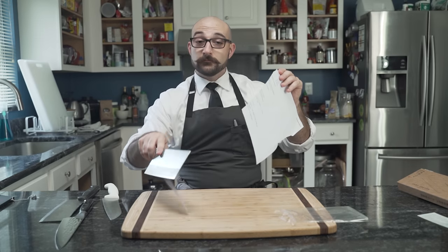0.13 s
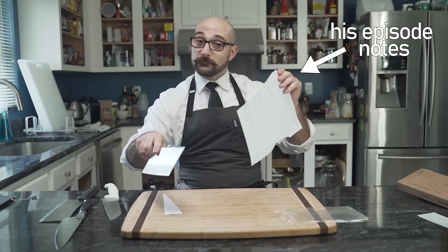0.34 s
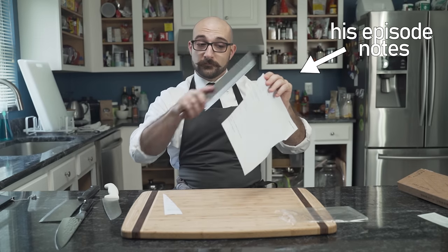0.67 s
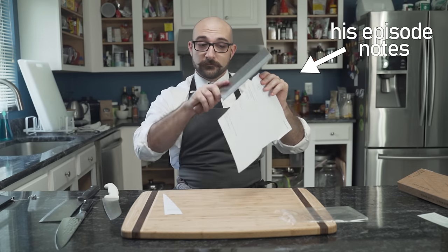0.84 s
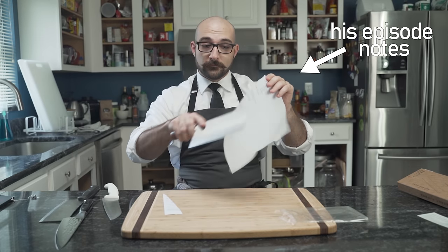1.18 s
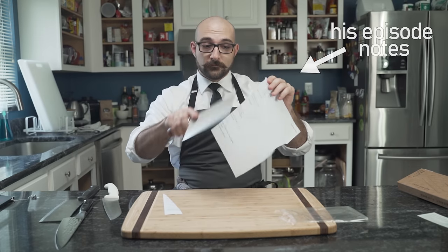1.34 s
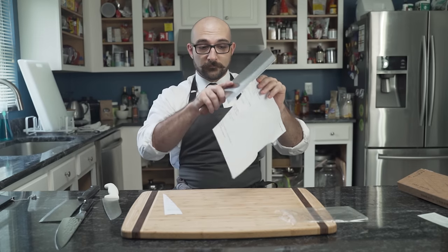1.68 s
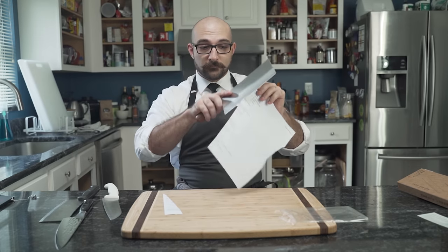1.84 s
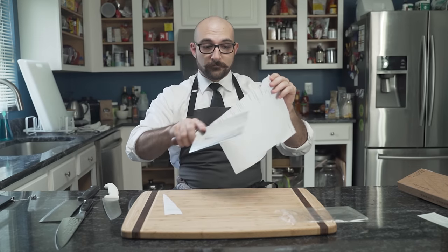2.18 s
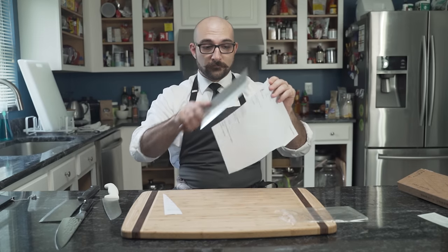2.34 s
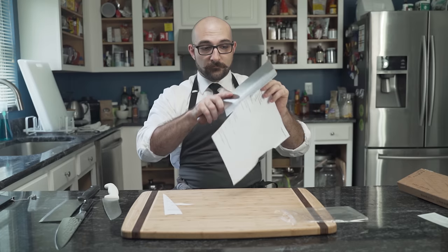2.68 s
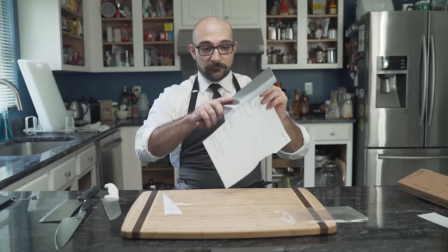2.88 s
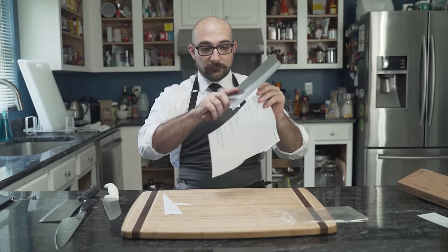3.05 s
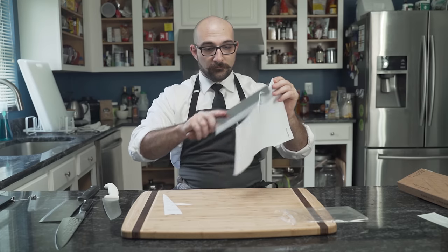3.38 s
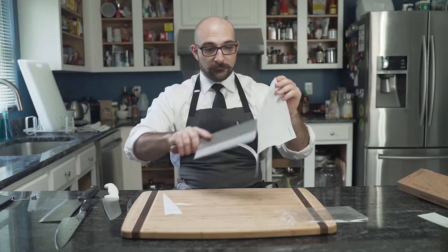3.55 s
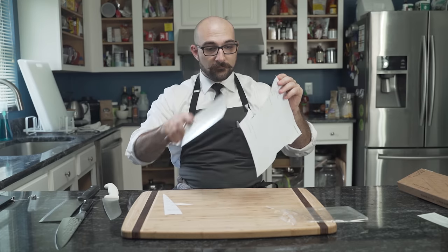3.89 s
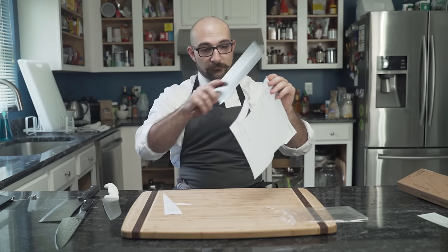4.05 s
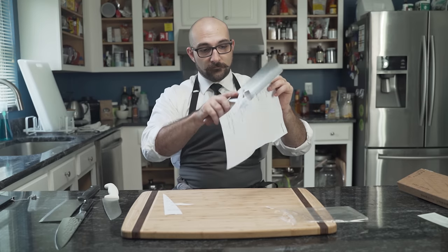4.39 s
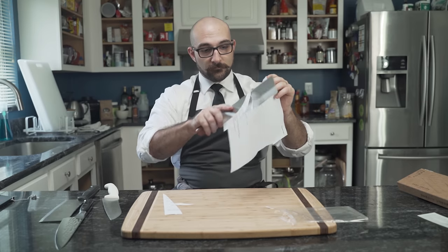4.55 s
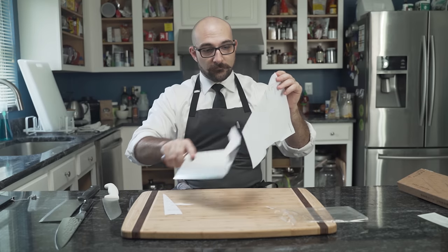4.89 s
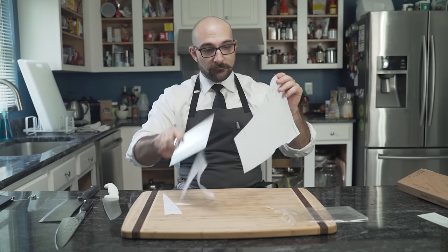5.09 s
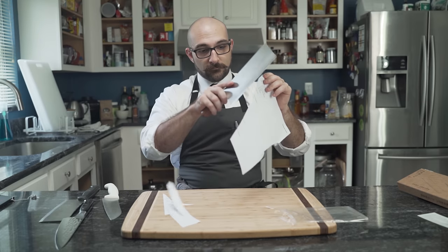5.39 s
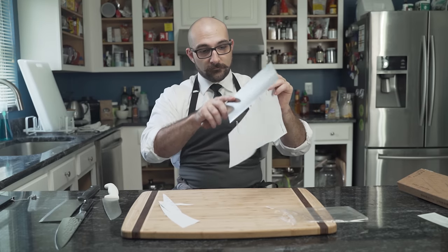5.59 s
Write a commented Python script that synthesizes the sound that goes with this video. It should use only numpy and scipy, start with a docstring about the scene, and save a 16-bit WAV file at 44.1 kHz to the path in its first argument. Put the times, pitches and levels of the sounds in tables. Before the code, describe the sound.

In a reflective kitchen with a faint fridge hum, a large knife slices a hanging sheet of paper. After a nearly quiet first second, short hissing, crackling cuts come in uneven groups, with sharp paper snaps and soft flaps. Thin blade ringing lingers between strokes. The microphone is fairly close and clear, with a short bright room echo.

```python
"""A steel cleaver slices a hand-held sheet of paper in nine strokes, in a hard-walled kitchen.
Parting fibres crackle densely, ring the taut sheet and the paper-damped blade, and flap the loose part.
Off the paper the blade rings on as steady sines until the next touch. During and between cuts the sheet
snaps and buzzes as shaped noise; it also ticks and rustles, and its jerks push low puffs of air.
The paper's echo is a dense decaying tail; a fridge hums behind in steady air noise."""
import sys
import numpy as np
from scipy import signal
from scipy.fft import rfft, irfft, next_fast_len
from scipy.io import wavfile
from scipy.ndimage import uniform_filter1d

SR = 44100
rng = np.random.default_rng(int(sys.argv[2]) if len(sys.argv) > 2 else 0)


def master(y):
    """Save y as 16-bit WAV."""
    cut = np.clip(np.atleast_2d(y).T, -1, 1)
    pcm = np.round(cut * 32767)  # scale
    wavfile.write(sys.argv[1], SR, pcm.astype(np.int16))


N = 252593  # length in samples

# Air noise of the place. Each row: frequency in Hz, relative density in dB per Hz.
AIR_SPECTRUM = [(12, -28.5), (22, 8), (44, -1), (62, -10.5), (120, -3), (200, -10.5), (240, -2),
                (320, -11.5), (680, -17.5), (760, -17), (1800, -27), (3000, -30), (4200, -28), (5200, -33),
                (16000, -44)]
AIR_DB = -63  # rms of the air noise
# Hum of the fridge motor. Each row: frequency in Hz, rms level in dB about which it drifts.
FRIDGE_HUM = [(118.4, -73.5), (177.6, -75.5), (236.9, -72), (349.9, -81.5), (468.3, -75.5), (527.6, -81),
              (586.8, -80), (646.0, -77), (705.2, -87)]
# Decay of the kitchen. Each row: frequency in Hz, time to fall 60 dB in seconds.
ROOM_T60 = [(200, 0.68), (1000, 0.71), (3000, 0.63), (5000, 0.71), (7500, 0.5), (10000, 0.35),
            (12500, 0.16), (15000, 0.2)]
# Colour of the kitchen's echo. Each row: frequency in Hz, relative level in dB.
ECHO_COLOUR = [(200, 7), (4500, -1.5), (6000, -1.5), (15000, -0.5)]
ECHO_DB = -11.5  # energy of the echo against the direct sound
EARLIER_CUT_DB = -40  # a cut just before the start, whose echo still hangs in the room

# The sheet jerks and pushes air. Each row: start in seconds, level in dB, frequency in Hz.
AIR_PUFFS = [(1.252, -46, 250), (1.933, -34, 245), (1.992, -23.5, 320), (2.03, -36, 93), (2.66, -42, 303),
             (2.672, -44, 412), (2.698, -43, 640), (3.282, -42, 302), (3.334, -39, 290), (3.608, -41, 336),
             (5.002, -42, 360)]
# High ticks of paper settling. Each row: start in seconds, peak in dB.
SETTLING_TICKS = [(0.173, -59), (0.3032, -51), (2.1265, -32.5), (2.1414, -47), (2.5451, -61), (5.069, -41),
                  (5.1202, -50), (5.167, -49), (5.2065, -47), (5.232, -52), (5.4005, -50), (5.48, -52),
                  (5.5513, -52)]
TICK_T60 = 0.025  # seconds to fall 60 dB
# A patch of the sheet buzzes under the edge. Each row: start in seconds, end in seconds, first pitch in Hz,
# last pitch in Hz, bandwidth in Hz, rms in dB before the swell.
PATCH_BUZZES = [(.97, 1.06, 4000, 4250, 450, -52), (.968, 1.05, 5480, 5500, 110, -61),
                (4.53, 4.66, 3400, 3760, 520, -37.5), (4.7, 4.78, 4500, 2740, 1850, -33.5),
                (3.0, 3.11, 3300, 4200, 710, -41.5), (1.08, 1.2, 920, 1300, 450, -43),
                (3.33, 3.39, 675, 710, 130, -41.5), (1.259, 1.29, 1430, 1400, 670, -40),
                (1.326, 1.397, 790, 1300, 440, -54.5), (1.855, 1.881, 1840, 1660, 150, -51.5),
                (1.906, 1.978, 1300, 1400, 400, -35), (2.685, 2.78, 2000, 3500, 2000, -50),
                (3.327, 3.413, 1360, 2100, 460, -50), (2.147, 2.185, 940, 1600, 930, -37.5),
                (2.956, 3.073, 1597, 1780, 170, -47), (3.48, 3.6, 3400, 4300, 900, -33.5),
                (4.41, 4.51, 1840, 1140, 540, -44.5), (4.44, 4.62, 1040, 1210, 220, -47.5),
                (2.012, 2.042, 2100, 4200, 1200, -23.5), (4.6, 4.72, 5850, 6600, 1200, -38.5)]
# Creases of the sheet snapping. Each row: start in seconds, body peak in dB, body pitch in Hz, tick peak in dB.
CREASE_SNAPS = [(0.209, -34, 1430, -77), (0.273, -30, 3920, -41.5), (0.972, -40, 4080, -67),
                (1.718, -27.5, 1420, -54.5), (1.742, -25, 3980, -42.5), (1.815, -32, 820, -41),
                (1.874, -25.5, 2190, -38), (1.887, -28, 4240, -39.5), (1.908, -28.5, 1560, -41.5),
                (1.931, -20.5, 1620, -27), (1.973, -15, 1260, -39), (1.994, -20, 1000, -41),
                (2.034, -26, 900, -47), (2.096, -23, 2020, -52), (2.305, -44.5, 2006, -52),
                (2.479, -40.5, 3920, -68.5), (2.659, -29, 1190, -35.5), (2.672, -27.5, 594, -65),
                (2.698, -30.5, 780, -37), (2.724, -35, 2500, -49), (2.738, -31.5, 1630, -48.5),
                (2.754, -26, 4240, -33), (2.767, -30.5, 4330, -39), (3.284, -23, 2400, -55),
                (3.331, -19.5, 1520, -38.5), (3.406, -35, 4190, -33.5), (3.512, -18, 3480, -42),
                (5.001, -39, 855, -42), (5.307, -36.5, 3730, -62), (5.324, -22, 1900, -43)]
# Broad part of a snap. Each row: frequency in Hz, relative level in dB.
CRACK_SPECTRUM = [(150, -22.5), (400, 0.5), (1500, 2), (4500, -2), (6000, -14), (10000, -33)]
SNAP_T60, SNAP_FALL = .034, .35  # seconds to fall 60 dB at 1 kHz; shortens as pitch to this power

# Modes of the blade; the first eight also ring freely off the paper. Each row: frequency in Hz,
# drive by the cut in dB.
BLADE_MODES = [(2138, -17), (2899, -21), (3701, -31.5), (4252, -28.5), (4530, -20), (7700, -27.5),
               (13600, -20), (14920, -20), (5480, -16), (6210, -14), (8450, -23.5), (10550, -30)]
# The blade is off the paper. Each row: start in seconds, next touch in seconds, then the starting rms in dB
# of each of the first eight modes.
FREE_RINGS = [(0, .96, -60, -63, -79, -80, -99, -99, -99, -99),
              (1.215, 1.705, -52, -42, -78, -58, -66, -62, -62, -49),
              (2.19, 2.62, -70, -72, -57, -70, -99, -99, -99, -99),
              (3.605, 4.38, -47, -76, -71, -48, -72, -72, -64, -62),
              (4.86, 5.32, -54, -60, -52, -58, -68, -70, -66, -56)]
# Seconds in which each of the first eight modes falls 60 dB in free air.
FREE_T60 = [1.8, 1.4, 1.8, .45, .5, .3, .14, .2]
# The swinging blade turns a mode away from the microphone. Each row: deepest moment in seconds,
# mode counted from zero, depth in dB, half width in seconds.
BLADE_TURNS = [(.12, 1, 5, .1), (.56, 0, 8, .04), (1.34, 0, 10, .06), (1.41, 1, 6, .06), (1.7, 1, 8, .1),
               (2.28, 2, 10, .015), (2.56, 2, 14, .09), (3.77, 2, 12, .07), (3.93, 0, 9, .09),
               (4.3, 0, 5, .07), (5.0, 1, 14, .09), (5.04, 2, 10, .03), (5.05, 0, 4, .03),
               (5.18, 2, 6, .012), (5.23, 0, 11, .08)]

# Parting fibres. Each row: frequency in Hz, relative level in dB.
HISS_SPECTRUM = [(300, -38), (1500, -12.5), (3000, -6), (5000, -14), (7000, 4.5), (10000, 1), (13000, -3),
                 (16000, -9)]
# The loose sheet flapping. Each row: frequency in Hz, relative level in dB.
FLAP_SPECTRUM = [(60, -34), (150, -26), (300, -4), (600, -4), (1100, 1.5), (1700, 2.5), (2600, 0.5),
                 (5000, -43.5)]
# One list for each stroke of the edge through the paper. Each row: time in seconds, edge hiss in dB.
EDGE_STROKES = [
    [(.968, -75), (.978, -61.5), (1.053, -59), (1.065, -49.5), (1.125, -38), (1.145, -34.5), (1.185, -37.5),
     (1.213, -32.5), (1.24, -58)],
    [(1.704, -70), (1.708, -61), (1.728, -68), (1.757, -36.5), (1.785, -45), (1.82, -65.5)],
    [(1.82, -69), (1.87, -41), (1.905, -63)],
    [(1.905, -58), (1.935, -40.5), (1.985, -32), (2.017, -27.5), (2.036, -25), (2.055, -46), (2.065, -51.5),
     (2.14, -59.5)],
    [(2.62, -72), (2.638, -52), (2.685, -62), (2.694, -51), (2.76, -49.5), (2.79, -76)],
    [(2.957, -56), (2.964, -52), (3.04, -45.5), (3.128, -48), (3.19, -72)],
    [(3.19, -77.5), (3.234, -54), (3.296, -56.5), (3.326, -56), (3.342, -39), (3.4, -33), (3.45, -36),
     (3.524, -43), (3.6, -34.5), (3.61, -49), (3.78, -80)],
    [(4.32, -76.5), (4.38, -67.5), (4.392, -46.5), (4.47, -43.5), (4.582, -37.5), (4.61, -40.5),
     (4.69, -43), (4.75, -43.5), (4.812, -39), (4.856, -39.5), (4.868, -50.5), (4.995, -74)],
    [(5.563, -77), (5.568, -52), (5.59, -43), (5.626, -45.5), (5.727, -38.5)],
]
# How the sheet hangs in each stroke, at a hiss of FIRM_DB. Each row: ring above the hiss in dB,
# flap above the hiss in dB.
SHEET_HANG = [(3.5, 0.5), (5, -0.5), (1, 4), (2.5, 0.5), (-4, -5.5), (1, -7.5), (3, -0.5), (1, -7.5),
              (-4, -8.5)]
FIRM_DB = -40
RING_SLOPE, FLAP_SLOPE = -0.12, -0.13  # ring and flap lose less than the hiss in a weak stroke, dB per dB
# The loose sheet rustles without a cut. Each row: loudest moment in seconds, rise in seconds, fall in seconds,
# hiss in dB, ring above the hiss in dB, flap above the hiss in dB.
SHEET_RUSTLES = [(.075, 0.01, 0.034, -60.5, 2, -3), (1.261, 0.035, 0.033, -61, 18, 28),
                 (2.16, 0.021, 0.035, -86, -27.5, 25), (2.255, .4, .02, -62.5, -0.5, 0),
                 (2.308, .008, 0.0093, -60.5, 2.5, 9), (5.001, 0.0043, 0.11, -58, 10, 5),
                 (5.207, 0.092, 0.11, -71, 2, 8.5), (5.335, 0.015, 0.037, -70, 26.5, 31),
                 (5.43, .3, 0.51, -79, 16.5, 2)]
RUSTLE_SPAN_DB = 25  # level change over the rise and over the fall

# Presence peak of the microphone. Each row: frequency in Hz, gain in dB.
MIC_RESPONSE = [(2500, -0.5), (3900, 1), (4800, -0.5), (5500, -2), (16000, -0.5)]
RECORDER_LIMIT_HZ = 15750


def gain_of(db):
    """Decibels to amplitude."""
    return 10 ** (np.asarray(db) / 20)


def evened(x):
    """Scales to an rms of one."""
    return x / np.sqrt(np.mean(x ** 2) + 1e-20)


def peaked(x):
    """Scales to a peak of one."""
    return x / abs(x).max()


def read(points, hz):
    """Reads a (Hz, value) table on a log-frequency axis."""
    f, value = np.transpose(points)
    return np.interp(np.log(hz + 1), np.log(f + 1), value)


def add(mix, s, sound):
    """Mixes a sound in at s seconds."""
    part = mix[round(s * SR):][:len(sound)]
    part += sound[:len(part)]


def colour(x, spectrum):
    """Filters by a (Hz, dB) table."""
    size = next_fast_len(len(x))
    gain = gain_of(read(spectrum, np.fft.rfftfreq(size, 1 / SR)))
    return irfft(rfft(x, size) * gain, size)[:len(x)]


def resonate(x, hz, width):
    """Shifts the curve hz down to zero, smooths, and shifts back: a resonance of gain 1."""
    turn = np.exp(2j * np.pi * np.cumsum(hz * np.ones(len(x))) / SR)
    r = np.exp(-np.pi * width / SR)
    smooth = signal.lfilter([1 - r], [1, -r], x / turn)
    return 2 * (turn * smooth).real


def air_noise():
    """Steady coloured noise: the air of the place."""
    return gain_of(AIR_DB) * evened(colour(rng.standard_normal(N), AIR_SPECTRUM))


def fridge():
    """Motor hum: steady tones, each drifting slightly in level."""
    t, hum = np.arange(N) / SR, np.zeros(N)
    for hz, db in FRIDGE_HUM:
        drift = evened(uniform_filter1d(rng.standard_normal(N), size=6000))
        tone = np.sqrt(2) * np.sin(2 * np.pi * (hz * t + rng.random()))
        hum += gain_of(db + 0.83 * drift) * tone
    return hum


def kitchen_echo(x):
    """Sparse taps of random sign, one in every 20 samples, each band dying at its own speed."""
    taps = np.zeros(SR)
    at = np.arange(200, SR - 20, 20)
    taps[at + rng.integers(0, 20, len(at))] = rng.choice([-1., 1.], len(at))
    hz, t, z = signal.stft(taps, SR, nperseg=256)
    decay_db = -60 * t / read(ROOM_T60, hz)[:, None]
    colour_db = read(ECHO_COLOUR, hz)[:, None]
    tail = signal.istft(z * gain_of(decay_db + colour_db), SR, nperseg=256)[1]
    return gain_of(ECHO_DB) * signal.fftconvolve(x, tail / np.linalg.norm(tail))[:len(x)]


def earlier_cut():
    """A tenth of a second of sheet ring and fibre hiss, then as long a silence."""
    noise = rng.standard_normal(SR // 10)
    ring = resonate(noise, 3600.0, 2800.0)
    cut = evened(ring + .5 * colour(noise, HISS_SPECTRUM))
    return np.r_[gain_of(EARLIER_CUT_DB) * cut, np.zeros(SR // 10)]


def puffs():
    """The jerking sheet pushes air: 2.6 cycles of low pressure under a smooth hump."""
    out = np.zeros(N)
    for s, db, hz in AIR_PUFFS:
        turns = np.arange(round(2.6 * SR / hz)) * hz / SR
        add(out, s, gain_of(db) * np.sin(2 * np.pi * turns) * signal.windows.hann(len(turns)))
    return out


def ticks():
    """Settling paper: short bursts of treble noise with a softened start."""
    out, t = np.zeros(N), np.arange(3000) / SR
    high = signal.butter(2, 5500., "high", fs=SR)
    fade = gain_of(-60 * t / TICK_T60) * np.minimum(t / 0.00073, 1)
    for s, db in SETTLING_TICKS:
        treble = signal.lfilter(*high, rng.standard_normal(len(t)))
        add(out, s, gain_of(db) * peaked(fade * treble))
    return out


def buzzes():
    """Noise in one gliding resonance, swelling a little faster than it dies."""
    out = np.zeros(N)
    for start, stop, first_hz, last_hz, width_hz, db in PATCH_BUZZES:
        u = np.linspace(0, 1, round((stop - start) * SR))
        hz = first_hz + (last_hz - first_hz) * u
        tone = resonate(resonate(rng.standard_normal(len(u)), hz, width_hz), hz, width_hz)
        swell = np.sin(np.pi * u ** 0.89)
        add(out, start, gain_of(db) * evened(tone) * swell)
    return out


def snaps():
    """Each snap kicks the sheet once, then rattles it around its pitch, with a sharp tick on top."""
    out, t = np.zeros(N), np.arange(3000) / SR
    for s, body_db, hz, tick_db in CREASE_SNAPS:
        rattle, tick, crack = rng.standard_normal((3, len(t)))
        t60 = SNAP_T60 * (hz / 1e3) ** -SNAP_FALL
        fade = gain_of(-60 * t / t60) * np.minimum(t / .0004, 1)
        kicked = rattle + 6.7 * (np.arange(len(t)) == 14)  # one click early in the noise
        width = .6 * hz + 600.0
        ring = evened(resonate(resonate(kicked, hz, width), hz, width))
        body = ring + 0.69 * evened(colour(crack, CRACK_SPECTRUM))
        add(out, s, gain_of(body_db) * peaked(fade * body))
        add(out, s, gain_of(tick_db) * peaked(fade * colour(tick, HISS_SPECTRUM)))
    return out


def free_blade():
    """Free steel modes, steady in pitch, die away, dip as the face turns and stop at the next touch."""
    t, hz = np.arange(N) / SR, np.transpose(BLADE_MODES)[0][:8, None]
    tones = np.sqrt(2) * np.sin(2 * np.pi * (hz * t + rng.random((8, 1))))
    level = np.zeros((8, N))
    for start, stop, *levels_db in FREE_RINGS:
        on = (t >= start) & (t < stop)
        level[:, on] = gain_of(np.c_[levels_db] - 60 * (t[on] - start) / np.c_[FREE_T60])
    for s, mode, depth_db, half_s in BLADE_TURNS:
        level[round(mode)] *= gain_of(-depth_db * np.exp(-((t - s) / half_s) ** 2))
    return (uniform_filter1d(level, size=300, axis=1) * tones).sum(0)


def patchy(x, patch_db):
    """Lays drifting loud and soft patches over time and frequency, as a bending sheet shifts its resonances."""
    z = signal.stft(x, nperseg=256, noverlap=192)[2]
    across_hz = uniform_filter1d(rng.standard_normal(z.shape), size=3, axis=0)
    patches = evened(uniform_filter1d(across_hz, size=30, axis=1))
    return evened(signal.istft(z * gain_of(patch_db * patches), nperseg=256, noverlap=192)[1][:N])


def crackle(per_s, spread_db, clump_db):
    """Fibres break as random clicks of uneven size that come in clumps of a few milliseconds."""
    clumps = evened(uniform_filter1d(rng.standard_normal(N), size=180))
    spread = np.minimum(rng.exponential(1, N), 5)
    size = gain_of(spread_db * spread + clump_db * clumps)
    return size * rng.choice([-1., 1.], N) * (rng.random(N) < per_s / SR)


def cut_levels():
    """Gains of hiss, ring and flap: strokes follow their curves, rustles rise and fall."""
    t, out = np.arange(N) / SR, np.zeros((3, N))
    for rows, (ring_db, flap_db) in zip(EDGE_STROKES, SHEET_HANG):
        s, db = np.transpose(rows)
        on = (t >= s[0]) & (t < s[-1])
        hiss_db = np.interp(t[on], s, db)
        above_firm = hiss_db - FIRM_DB
        ring_offset = ring_db + RING_SLOPE * above_firm
        flap_offset = flap_db + FLAP_SLOPE * above_firm
        out[:, on] += gain_of(hiss_db + np.array([0 * above_firm, ring_offset, flap_offset]))
    for s, rise, fall, hiss_db, ring_db, flap_db in SHEET_RUSTLES:
        away = np.minimum(np.where(t < s, (s - t) / rise, (t - s) / fall), 8)
        out += gain_of(hiss_db + np.c_[[0, ring_db, flap_db]]) * gain_of(-RUSTLE_SPAN_DB * away)
    return uniform_filter1d(out, size=90, axis=1)


def rubbed_blade(fibres, hiss, ring):
    """The same rubbing drives the blade, whose modes the paper damps to short rings."""
    rub, out = evened(fibres), np.zeros(N)
    for hz, db in BLADE_MODES:
        level = ring if hz < 5000 else hiss
        out += gain_of(db) * level * evened(resonate(rub, hz, 0.0078 * hz))
    return out


def cuts():
    """The edge hisses through the fibres, the taut sheet rings near the cut and the loose part flaps."""
    hiss, ring, flap = cut_levels()
    fibres = crackle(14000., 1.2, 0.91)
    taut = resonate(resonate(fibres, 3750.0, 2800.0), 3850., 2700.0)
    loose = colour(crackle(6000., 1.8, 1.4), FLAP_SPECTRUM)
    sheet = hiss * patchy(colour(fibres, HISS_SPECTRUM), 4.8)
    sheet += ring * patchy(taut, 2.7)
    sheet += flap * patchy(loose, 3.2)
    return sheet + rubbed_blade(fibres, hiss, ring)


def scene():
    """Cuts and paper with their kitchen echo; puffs, free blade, air noise and fridge without it."""
    paper = cuts() + snaps() + ticks() + buzzes()
    lead = earlier_cut()
    echo = kitchen_echo(np.r_[lead, paper])[len(lead):]  # the earlier cut is heard only through its echo, which runs on under the paper's own
    return (paper + echo + puffs() + free_blade() + air_noise() + fridge())[None]


def record(dry):
    """The colour of the microphone, then the band limit of the recorder."""
    heard = colour(dry[0], MIC_RESPONSE)[None]
    low_pass = signal.firwin(511, RECORDER_LIMIT_HZ, window=("kaiser", 9), fs=SR)[None]
    return signal.oaconvolve(heard, low_pass, "same")


dry = scene()
out = record(dry)
master(out)
```